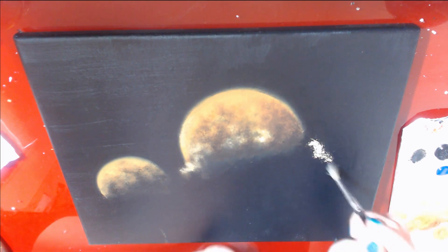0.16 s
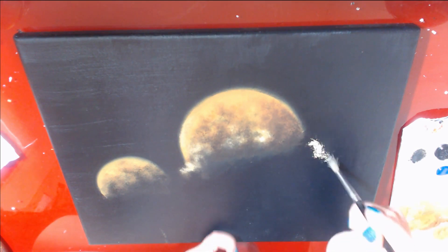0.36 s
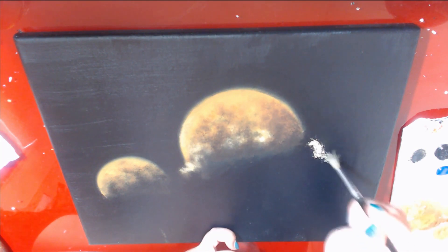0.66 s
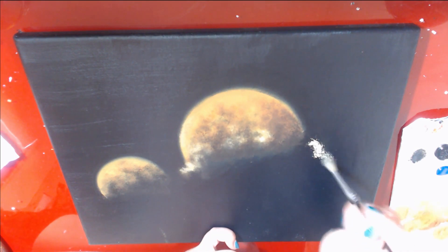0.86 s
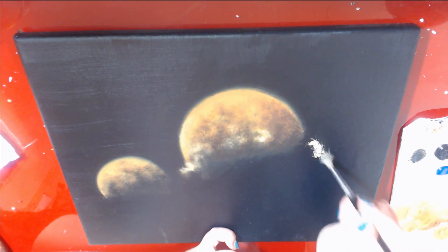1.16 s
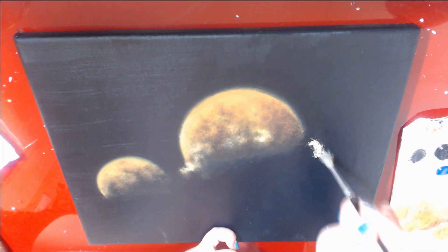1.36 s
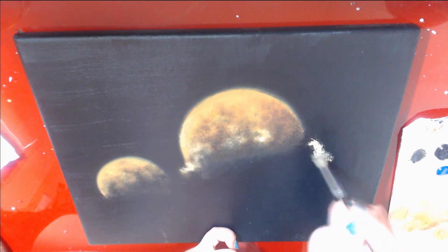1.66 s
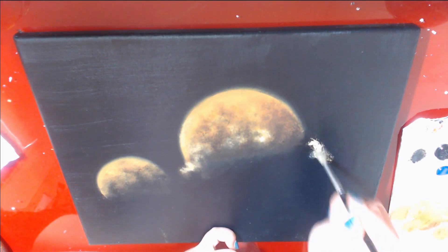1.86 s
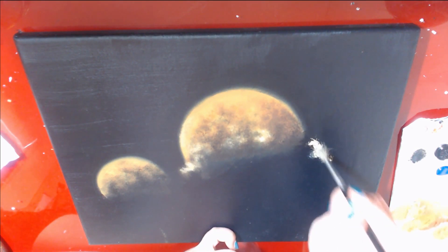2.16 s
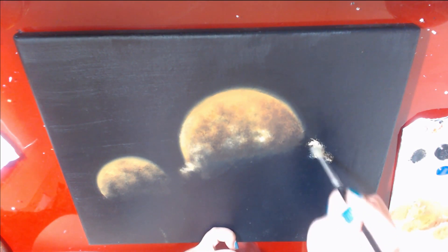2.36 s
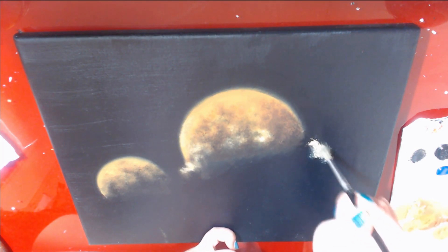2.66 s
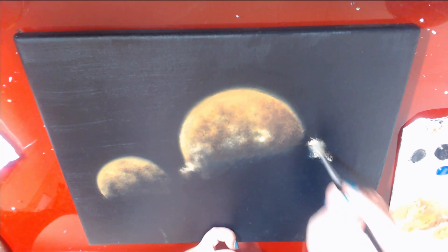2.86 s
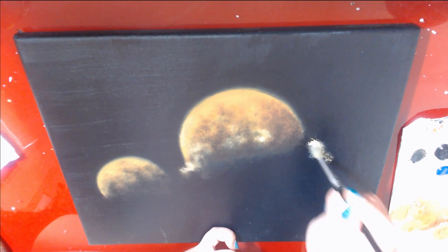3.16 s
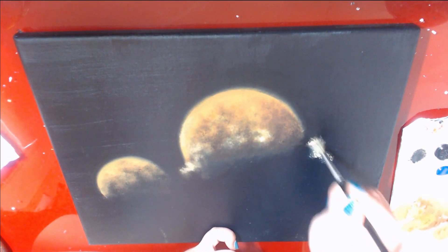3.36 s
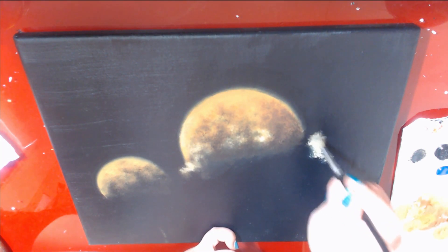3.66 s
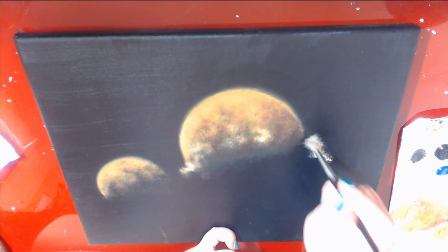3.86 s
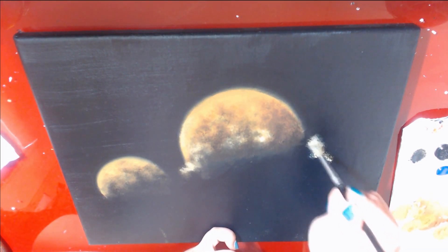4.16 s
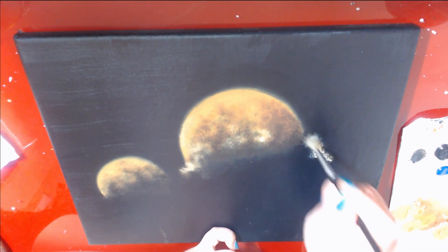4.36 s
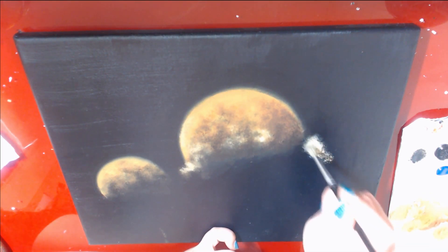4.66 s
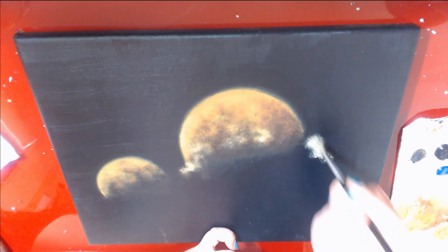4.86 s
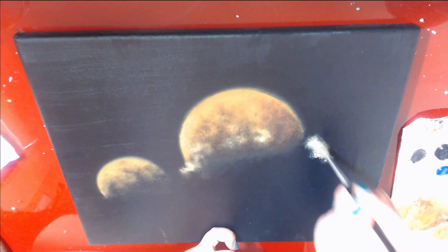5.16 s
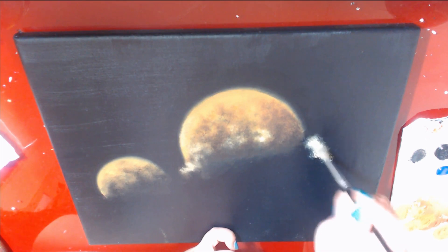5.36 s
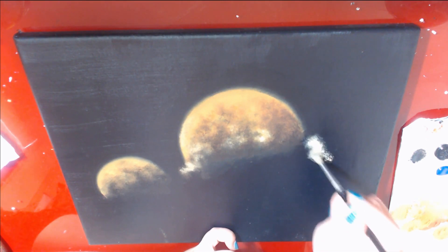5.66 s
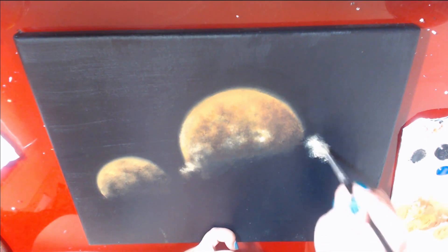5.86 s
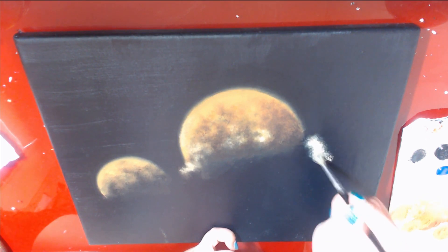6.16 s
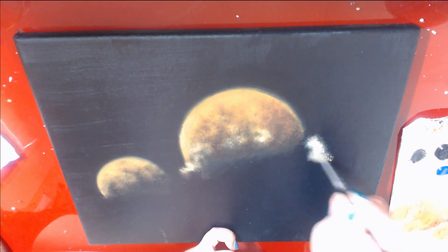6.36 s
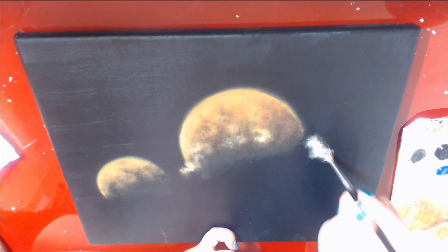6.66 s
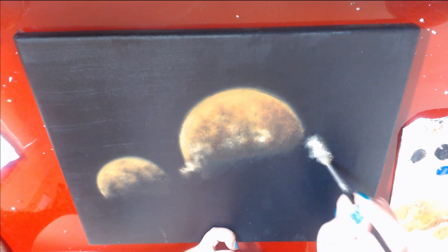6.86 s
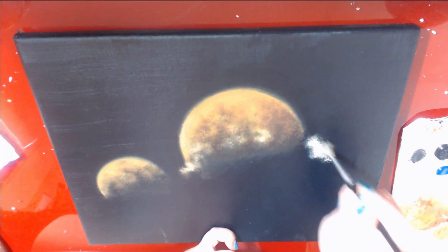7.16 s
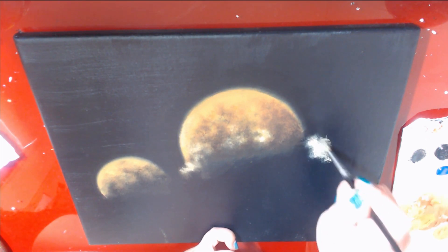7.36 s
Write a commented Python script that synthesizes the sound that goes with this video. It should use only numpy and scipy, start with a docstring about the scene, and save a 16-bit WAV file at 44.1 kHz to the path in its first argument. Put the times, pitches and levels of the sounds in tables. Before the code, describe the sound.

A quiet room with deep rumble, a soft airy rush and a barely audible hum opens the sound; a low gust swells as a brush swings in. From 0.35 s it dabs thick paint on stretched canvas, close to the microphone, about six times a second until the end at roughly 7.5 s. Each dab lasts only 30 to 50 milliseconds: a muted, hollow cloth thud, a low shove, dry bristle scuffing and crackle, then a faint wet peel. Slow air pressure pulses beneath. The first dabs are strongest; after 3.3 s they are generally softer, with uneven force and slightly shifting tone. Tiny paint snaps scatter throughout, with a bright flick near 2.9 s, clear ticks around 4.9 s, and the sharpest cluster at 5.5 s, more at 5.8 to 5.9 s. A very faint sagging squeak comes at 5.1 s. Reflections are short and dull.

```python
"""In a quiet room with a deep rumble, an airy rush and a faint hum, a brush swings in with a deep gust. From
0.35 s it dabs thick paint on a stretched canvas, close by, about six times a second. In each dab, bursts of
tiny random blows ring the canvas, shove it softly and scuff through the bristles, while a slow push of air
builds, holds and swings back; then the wet tip peels off. Sharp ticks are paint snaps, landing tips, flicked
bristles and breaking paint threads. A sagging tone squeaks once at 5.1 s. Filtered noise makes the room."""
import sys
import numpy as np
from scipy import signal
from scipy.fft import rfft, irfft
from scipy.io import wavfile

SR = 44100
rng = np.random.default_rng(int(sys.argv[2]) if len(sys.argv) > 2 else 0)


def digitize_waveform(pressure):
    """Quantize a signal to 16-bit integers and store it at the path in sys.argv[1].

    Rows of a 2-D input are taken as channels; values are limited to [-1, 1].
    """
    field = np.atleast_2d(pressure).T
    bounded = np.clip(field, -1, 1)
    quanta = np.round(bounded * 32767).astype(np.int16)
    wavfile.write(sys.argv[1], SR, quanta)


N = 330750

# One row for each dab of the brush:
# [landing t/s, contact length t/s, delay from landing to the hardest push t/s, strength level/dB]
DABS = [(0.353, 0.026, 0.0094, -34), (0.518, 0.039, 0.0097, -38), (0.685, 0.039, 0.011, -40),
        (0.87, 0.029, 0.004, -35.5), (1.04, 0.03, 0.0079, -39), (1.187, 0.046, 0.029, -39.5),
        (1.363, 0.036, 0.024, -37.0), (1.541, 0.024, 0.0065, -36.5), (1.687, 0.041, 0.035, -40),
        (1.858, 0.033, 0.016, -34.5), (2.033, 0.036, 0.012, -38.5), (2.207, 0.034, 0.0046, -38),
        (2.375, 0.03, 0.0065, -40.5), (2.525, 0.03, 0.013, -39.5), (2.689, 0.033, 0.0057, -39),
        (2.856, 0.036, 0.02, -38), (3.017, 0.035, 0.017, -37), (3.169, 0.048, 0.035, -40.5),
        (3.332, 0.048, 0.036, -44), (3.497, 0.048, 0.036, -40.5), (3.666, 0.039, 0.024, -45.5),
        (3.829, 0.038, 0.02, -45.5), (4.007, 0.027, 0.0088, -39), (4.158, 0.043, 0.022, -44),
        (4.329, 0.046, 0.016, -41), (4.498, 0.041, 0.018, -42.5), (4.676, 0.04, 0.0091, -44.9),
        (4.832, 0.036, 0.024, -42.5), (5.022, 0.034, 0.016, -41), (5.195, 0.036, 0.014, -43.6),
        (5.351, 0.039, 0.014, -41.5), (5.502, 0.049, 0.029, -40.5), (5.655, 0.044, 0.035, -45),
        (5.817, 0.043, 0.013, -46.5), (5.987, 0.035, 0.013, -41.5), (6.152, 0.035, 0.015, -42),
        (6.322, 0.036, 0.012, -42.2), (6.481, 0.058, 0.017, -46), (6.625, 0.032, 0.03, -40.5),
        (6.792, 0.036, 0.029, -40.5), (6.954, 0.044, 0.035, -43), (7.117, 0.044, 0.023, -43.5),
        (7.281, 0.036, 0.025, -42.5), (7.438, 0.04, 0.017, -43)]
# The brush wanders over the canvas and its load of paint changes:
# [t/s, tilt from lower to upper canvas modes level/dB (weighted in canvas()), scratchiness level/dB]
SPOTS = [(0.35, -6.5, -2), (0.9, -0.5, -0.3), (1.7, -1.13, -0.28), (2.4, 2.5, 0), (3.2, 2.5, -0.2),
         (4.1, 4, 0), (4.9, 3.5, 1.3), (5.7, -1, -1), (6.35, 2.5, -0.5), (6.7, -4, -0.4), (7.45, -1, -2.5)]
# Pressure held beside the hardest push (0-1), before each sound and dab length adjusts it
HOLD = 0.57
# A typical paint snap: centre in Hz, and octaves from there to where its gain is 1/e
SNAP_HZ, SNAP_OCTAVES = 5330, 1.32


def amp(db):
    """Turns decibels into a plain gain."""
    return 10 ** (np.asarray(db) / 20)


def unit(x):
    """Scales a sound to an rms (average strength) of 1."""
    return x / np.sqrt(np.mean(x ** 2) + 1e-20)


def add(mix, s, sound):
    """Mixes a sound in at time s, in seconds."""
    part = mix[max(round(s * SR), 0):][:len(sound)]
    part += sound[:len(part)]


def bins(size):
    """Lists the frequencies of a spectrum from 0 Hz to SR / 2."""
    return np.fft.rfftfreq(size, 1 / SR)


def bell(hz, centre_hz, octaves):
    """Draws a smooth hump of height 1 over pitch; it falls to 1/e at the given octaves from its centre."""
    return np.exp(-(np.log2((hz + 1) / centre_hz) / octaves) ** 2)


def contour(points, hz):
    """Reads the gain at the frequencies hz from a spectrum drawn as (Hz, dB) points."""
    f, db = np.transpose(points)
    return amp(np.interp(np.log(hz + 1), np.log(f), db))


def noise(gain_at):
    """Makes steady noise of rms 1 by shaping the spectrum of white noise."""
    spectrum = rfft(rng.standard_normal(N))
    return unit(irfft(spectrum * gain_at(bins(N)), N))


def response(gain):
    """Finds how a body rings after one blow, with energy 1, from its gains between 0 Hz and SR / 2."""
    log_gain = np.log(np.maximum(gain / gain.max(), 1e-4))
    # minimum phase: the energy of the ring comes as early as these gains allow
    circle = np.concatenate([log_gain, log_gain[-2:0:-1]])
    spectrum = np.exp(np.conj(signal.hilbert(circle)))
    impulse = np.fft.ifft(spectrum).real[:len(gain)]
    return impulse / np.linalg.norm(impulse)


def ring(x, points):
    """Lets the blows x ring a body whose spectrum is drawn as (Hz, dB) points."""
    body = response(contour(points, bins(size=4096)))
    return signal.oaconvolve(x, body)[:N]


def blows(count, per_s, spread_db):
    """Scatters tiny random blows of uneven size that push either way."""
    chance = rng.random(count)
    size = rng.exponential(1, count)
    sign = rng.choice([-1, 1], count)
    return (chance < per_s / SR) * sign * amp(spread_db * np.minimum(size, 3.5))


def burst(pressure, length, db, per_s, spread_db):
    """Lets pressure shape random blows; their whole energy gives the level db over length seconds."""
    x = pressure * blows(len(pressure), per_s, spread_db)
    return amp(db) * unit(x) * np.sqrt(length * SR / len(x))


def contact(length, peak, hold, rise, release, crest):
    """Draws the pressure of one dab: a landing, a held push with one crest, and a short release."""
    t = np.arange(int((length + 5 * release) * SR)) / SR
    # a long dab presses more evenly than a short jab: extra hold per s beyond the usual length
    usual_s, hold_per_s = 0.037, 15
    hold = np.clip(hold + hold_per_s * (length - usual_s), 0, 1)
    push = hold + (1 - hold) * np.exp(-((t - peak) / crest) ** 2)
    # a dab that pushes late lands more slowly: 0.02 s of extra rise per s of delay
    landing = np.minimum(t / (rise + 0.02 * peak), 1)
    return push * landing * np.exp(-np.maximum(t - length, 0) / release)


def canvas(lag=0.002, low_hz=745, high_hz=1250):
    """Tufts land one after another and drum on the cloth; each spot favours low or high modes."""
    out, hz = np.zeros(N), bins(size=8192)
    modes = canvas_gain(hz)
    # how each dB of tilt shifts the two main groups of modes
    upper = 0.12 * bell(hz, high_hz, octaves=0.34) - 1.36 * bell(hz, low_hz, octaves=0.12)
    times, tilts_db, _ = np.transpose(SPOTS)
    for s, length, peak, db in DABS:
        tilt_db = np.interp(s, times, tilts_db)
        pressure = contact(length, peak, HOLD, rise=0.0012, release=0.0041, crest=0.0069)
        drive = pressure * blows(len(pressure), per_s=1700, spread_db=1.9)
        thud = signal.fftconvolve(drive, response(modes * amp(tilt_db * upper)))
        # the strength of the dab is the level over its contact length
        add(out, s + lag, amp(db) * np.sqrt(length * SR) * thud / np.linalg.norm(thud))
    return out


def canvas_gain(hz):
    """Adds up the power of the modes, the pitches at which the framed cloth likes to swing."""
    # Modes of the canvas on its frame: [f/Hz, width f/Hz (0.69 of it from f, a mode halves), level/dB]
    modes = [(96, 40, -6), (166, 40, -9), (240, 60, -7), (330, 120, -12), (562, 75, -2.5), (628, 60, -6),
             (682, 55, 2.5), (750, 60, -1.5), (802, 50, -1), (970, 55, -3), (1016, 45, 0), (1090, 85, -2),
             (1230, 90, -1.5), (1325, 100, -4.5), (1605, 90, -10), (1720, 150, -12.5), (2085, 150, -9.5),
             (2520, 350, -21), (2850, 500, -25)]
    power = 0
    for f, width, db in modes:
        distance = (hz - f) / (0.69 * width)
        power = power + amp(db) ** 2 / (1 + distance ** 2) ** 2
    return np.sqrt(power)


def thump(thump_db=-9.5, lag=0.0059, stretch=1.31):
    """As the brush bottoms out, its weight gives the whole cloth a soft, low shove."""
    out = np.zeros(N)
    for s, length, _, db in DABS:
        weight = np.hanning(int(length * stretch * SR))
        add(out, s + lag, burst(weight, length, db + thump_db, per_s=2400, spread_db=4.0))
    return ring(out, [(50, -19), (100, 2), (190, -10.5), (245, 1), (340, -14.5), (430, -5.0), (900, -46)])


def bristles(touch_db=-7.5, rub_db=-4, crackle_db=-0.5, lift_delay=0.012, lift_length=0.06):
    """The tips touch with a dull scuff, splayed hairs rub and crackle, then the wet tip peels off softly."""
    # Colour of the bristles: [f/Hz, relative level/dB]
    colour = [(301, -11), (1501, -1.5), (2501, -1), (3301, 0.6), (3751, -0.5), (4151, 2.5), (4901, -2.1),
              (5451, 1.5), (7201, -5), (7701, -1.5), (9901, -10), (10801, -8), (13501, -9), (16001, -11)]
    # a dab that comes straight down strikes with its tips: extra dB, fading with the delay of the push
    strike_db, strike_s = 6, 0.013
    # the paint lets go below the bristle level, differently each time
    peel_below_db, peel_spread_db = -12, 2
    tips, hairs = np.zeros(N), np.zeros(N)
    for (s, length, peak, strength_db), tack in zip(DABS, rng.uniform(-1.1, 1, len(DABS))):
        db = scratch_db(s, strength_db)
        tips_db = db + touch_db + strike_db * np.exp(-peak / strike_s)
        peel_db = db + peel_below_db + peel_spread_db * tack
        pressure = contact(length, peak, HOLD + 0.17, rise=0.0048, release=0.0079, crest=0.011)
        # the tuft spreads under the push, so the bright hairs take over from the tips
        splay = np.minimum(np.arange(len(pressure)) / (0.41 * length * SR), 1)
        touch = pressure * (1 - 0.85 * splay)
        add(tips, s - .0015, burst(touch, length, tips_db, per_s=1500, spread_db=4))
        # many even blows make the rub, a few uneven ones the crackle
        add(hairs, s, burst(pressure * splay, length, db + rub_db, per_s=9000, spread_db=-1.0))
        add(hairs, s, burst(pressure * splay, length, db + crackle_db, per_s=600, spread_db=4.5))
        peel = np.sqrt(np.hanning(int(lift_length * SR)))
        add(hairs, s + length + lift_delay, burst(peel, lift_length, peel_db, per_s=1400, spread_db=3.5))
    dull_tips = ring(tips, [(400, -21.0), (2200, 7.5), (6000, 1.5), (9000, -1.5), (15000, -16)])
    return ring(hairs + dull_tips, colour)


def scratch_db(s, db):
    """Finds the basic bristle level of a dab from its strength and the paint on the brush."""
    times, _, scratchy_db = np.transpose(SPOTS)
    # a medium dab has -53.5 dB; bristles grow more slowly than the canvas (dB per dB)
    medium_db, level_db, slope = -40, -53.5, 0.75
    return level_db + slope * (db - medium_db) + np.interp(s, times, scratchy_db)


def snaps(scatter_octaves=0.19, lag=0.00099):
    """Paint snaps, tips tick as they land, bristles flick, and now and then a thread of paint breaks after the
    brush lifts."""
    # The loudest sharp ticks, mostly snaps of tacky paint, some bristle tips landing hard: [t/s (before the
    # lag), click peak level/dB]
    snap_rows = [(0.3591, -32), (0.8717, -36), (1.0764, -37), (1.269, -33), (1.6304, -33.5), (2.379, -31.5),
                 (2.4618, -37), (2.5276, -40), (2.6934, -36), (2.7823, -35.5), (3.2, -33), (3.3607, -39),
                 (4.0432, -36), (4.363, -34), (4.8608, -29), (4.9112, -28.5), (5.2845, -38), (5.5238, -25),
                 (5.5274, -28), (5.5324, -28), (5.8314, -30), (5.8375, -28), (5.8414, -31), (5.9058, -30),
                 (5.9106, -35), (6.3579, -43), (6.4782, -34), (6.4948, -34), (6.5762, -34), (6.7221, -37),
                 (7.1835, -37), (7.472, -34)]
    # Small pitched ticks, as of single bristles flicking free:
    # [t/s, click peak level/dB, centre f/Hz, octaves from the centre to a gain of 1/e]
    flick_rows = [(0.0673, -43, 4630, 0.4), (0.5056, -35, 4540, .18), (0.506, -35, 2130, .22),
                  (2.9312, -25, 11500, 0.5), (3.1065, -43, 4870, 0.23), (5.868, -44, 2370, .25),
                  (6.374, -43, 2480, .25)]
    # threads: share of dabs, delay after contact and its scatter either way in s, click peak in dB
    thread_chance, thread_delay, thread_scatter, thread_db = .35, 0.056, .01, -46.5
    out = np.zeros(N)
    for (s, db), colour in zip(snap_rows, rng.standard_normal(len(snap_rows))):
        centre_hz = SNAP_HZ * 2 ** (scatter_octaves * colour)
        add(out, s + lag, tick(db, centre_hz, SNAP_OCTAVES))
    for s, db, centre_hz, octaves in flick_rows:
        add(out, s, tick(db, centre_hz, octaves, after_db=-9, decay=.0025))
    for (s, length, *_), (chance, late) in zip(DABS, rng.random((len(DABS), 2))):
        if chance < thread_chance:
            thread_s = s + length + thread_delay + thread_scatter * (2 * late - 1)
            add(out, thread_s, tick(thread_db, SNAP_HZ, SNAP_OCTAVES))
    return out


def tick(db, centre_hz, octaves, after_db=-1.0, decay=0.0034):
    """Joins a sharp click that peaks at db with a few milliseconds of quivering hair."""
    t, hz = np.arange(600) / SR, bins(size=512)
    click = response(bell(hz, centre_hz, octaves))
    quiver = rng.standard_normal(len(t)) * np.exp(-t / decay)
    drive = (t == 0) + amp(after_db) * quiver / np.linalg.norm(quiver)
    return amp(db) * signal.fftconvolve(drive, click / abs(click).max())


def squeak(chirp_db=-60.5):
    """One faint squeak between two dabs: a sine whose pitch sags."""
    start, length, high_hz, low_hz = 5.115, .085, 2005, 1940
    t = np.arange(int(length * SR)) / SR
    hz = low_hz + (high_hz - low_hz) * (1 - t / length) ** 2
    tone = np.sin(2 * np.pi * np.cumsum(hz) / SR)
    faded = signal.windows.tukey(len(t), .5) * tone
    out = np.zeros(N)
    add(out, start, amp(chirp_db) * unit(faded))
    return out


def air_push(push_db=-33.5):
    """Air pressure builds as the stroke comes down, holds during contact and swings back as it lifts."""
    out = np.zeros(N)
    lead, rebound, settle = .07, .028, .07  # seconds
    for (s, length, *_), (dip, size_db) in zip(DABS, rng.standard_normal((len(DABS), 2))):
        t = np.arange(-lead, length + settle + rebound, 1 / SR)
        lifted = length + rebound
        knots = [-lead, -.012, length / 4, length * 3 / 4, lifted, lifted + settle]
        push = np.interp(t, knots, [0, 1, (1 + dip) / 2, 1, -1.35, 0])
        add(out, s - lead, push * amp(size_db))
    # only the slow movement below about 29 Hz stays
    smooth = signal.sosfiltfilt(signal.butter(2, 29, fs=SR, output="sos"), out)
    return amp(push_db) * (smooth - smooth.mean())


def approach(gust_db=-35, start=0.012, length=0.37, centre_hz=15):
    """The hand swings the brush in for the first dab and stirs a deep gust: a swell of low noise."""
    swell = np.zeros(N)
    add(swell, start, np.sqrt(np.hanning(int(length * SR))))
    return amp(gust_db) * swell * noise(lambda hz: bell(hz, centre_hz, octaves=1.15))


def reflections(x, wet_db=-17.0, t60=0.34, delay=0.0029, dull_hz=4400):
    """The table and the walls return a short, dull tail: fading noise that falls 60 dB in t60 seconds."""
    t = np.arange(SR // 2) / SR
    tail = rng.standard_normal(len(t)) * amp(-60 * t / t60) * (t > delay)
    tail = signal.lfilter(*signal.butter(1, dull_hz, fs=SR), tail)
    return amp(wet_db) * signal.oaconvolve(x, tail / np.linalg.norm(tail))[:N]


def room_noise(rush_db=-49.0, deep_db=-43.0):
    """Shapes noise into a deep rumble, a soft airy rush and a few narrow, wavering hum lines."""
    # Deep rumble: [f/Hz, relative level/dB (before the lows around and below 10 Hz are weakened)]
    deep = [(12, -1), (20, 0), (28, 6.5), (45, 1), (62, -10), (87, -2.5), (125, -11), (165, -10.5),
            (205, -26.5), (500, -60)]
    # Steady airy rush: [f/Hz, relative level/dB]
    airy = [(90, -8), (165, 3), (215, -1), (350, -3.5), (500, -7.5), (900, -5), (1280, -0.5), (1480, -7),
            (1720, -7), (2050, -15), (2450, -16.5), (2900, -23.5), (3850, -25), (5450, -24), (7000, -28.5),
            (15900, -31.5)]
    # Hum lines: [f/Hz, level/dB, distance from f at which the gain halves f/Hz]
    hum_lines = [(299.1, -63, 1.9), (366.5, -68, 1.5), (804, -64.5, 9.4)]
    rumble = amp(deep_db) * noise(lambda hz: contour(deep, hz) * hz / np.hypot(hz, 10))
    rush = amp(rush_db) * noise(lambda hz: contour(airy, hz))
    hum = np.zeros(N)
    for f, db, width in hum_lines:
        hum += amp(db) * noise(lambda hz: 1 / (1 + ((hz - f) / width) ** 2))
    return rumble + rush + hum


def scene():
    """Adds up the brush on the canvas, its reflections, the moved air and the room."""
    brush = canvas() + thump() + bristles() + snaps() + squeak()
    air = air_push() + approach()
    return (brush + reflections(brush) + air + room_noise())[None]


def record(dry):
    """Cuts off everything above about 16 kHz with a steep filter."""
    low_pass = signal.firwin(511, 15950, window=("kaiser", 9), fs=SR)
    return signal.oaconvolve(dry, low_pass[None], "same")


dry = scene()
out = record(dry)
digitize_waveform(out)
```